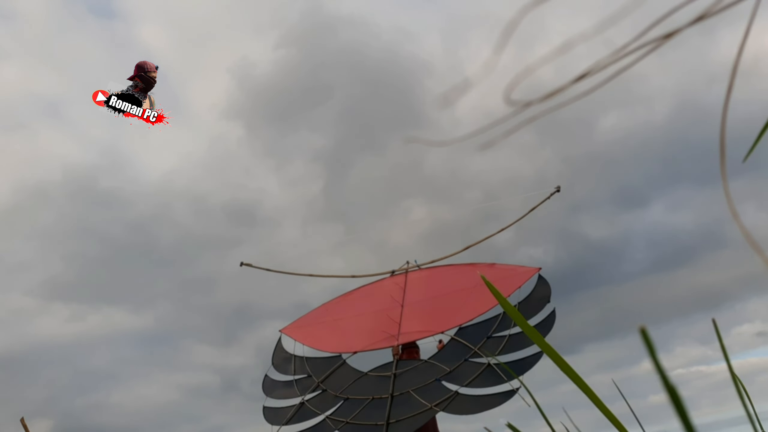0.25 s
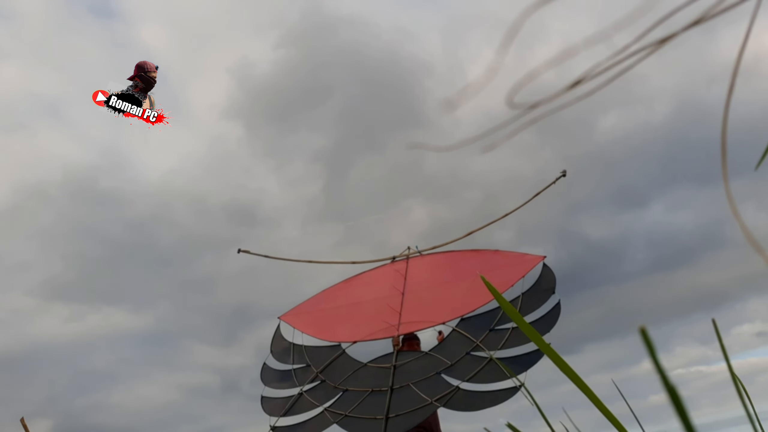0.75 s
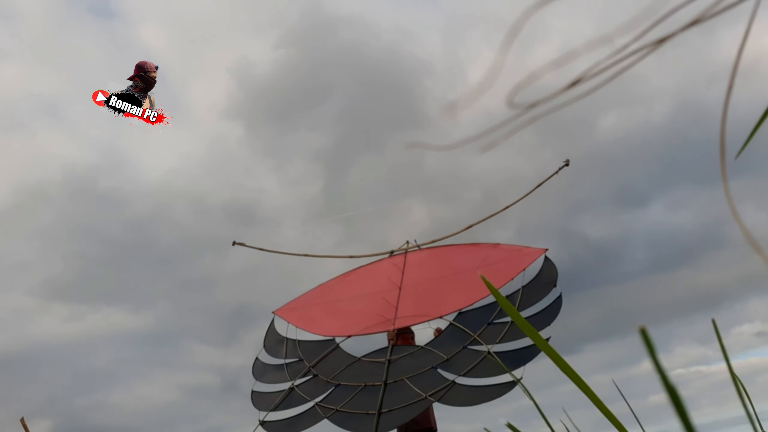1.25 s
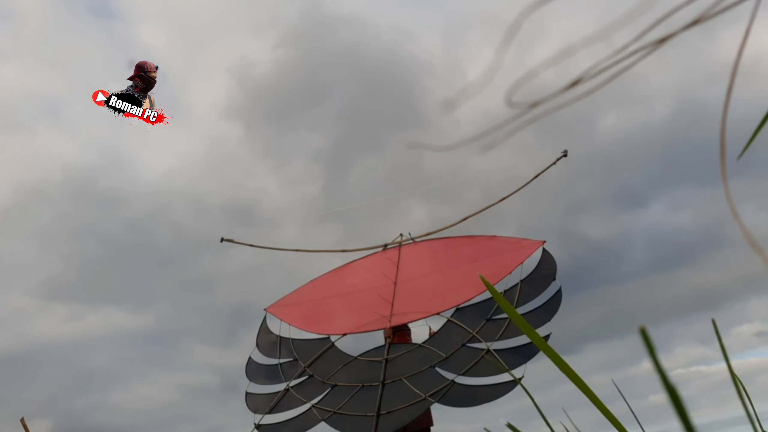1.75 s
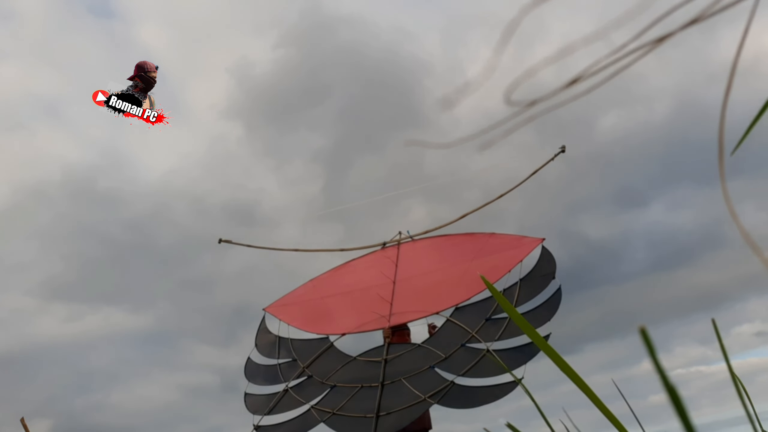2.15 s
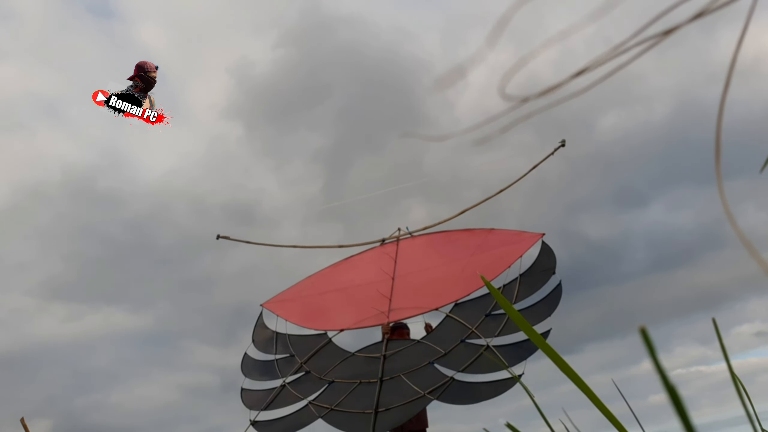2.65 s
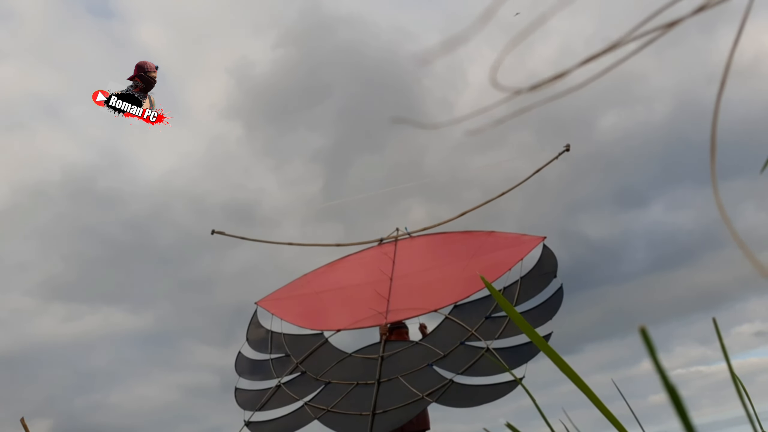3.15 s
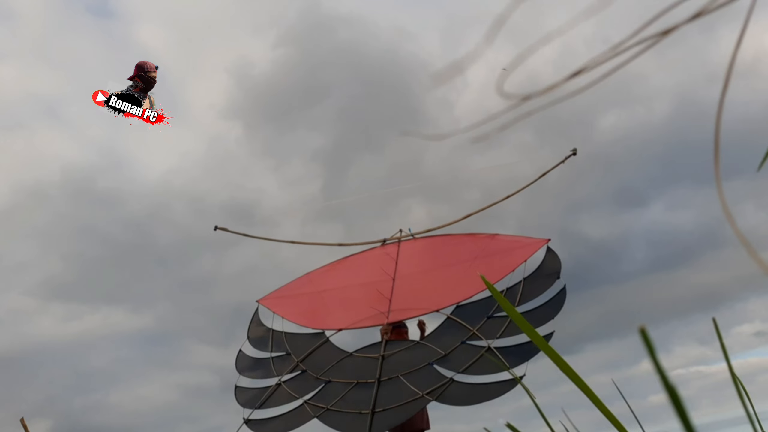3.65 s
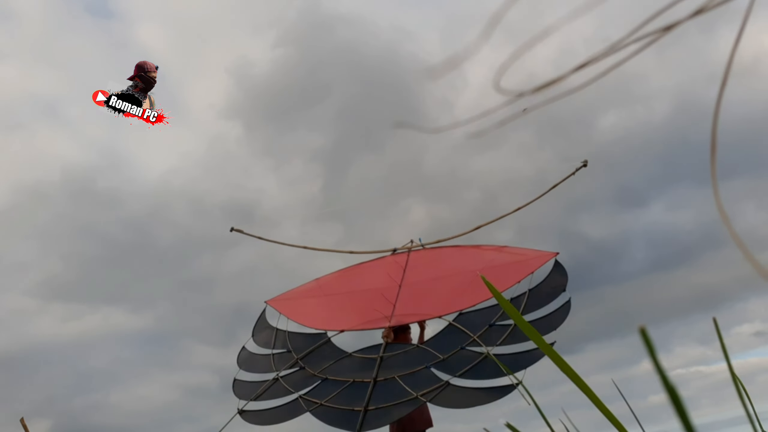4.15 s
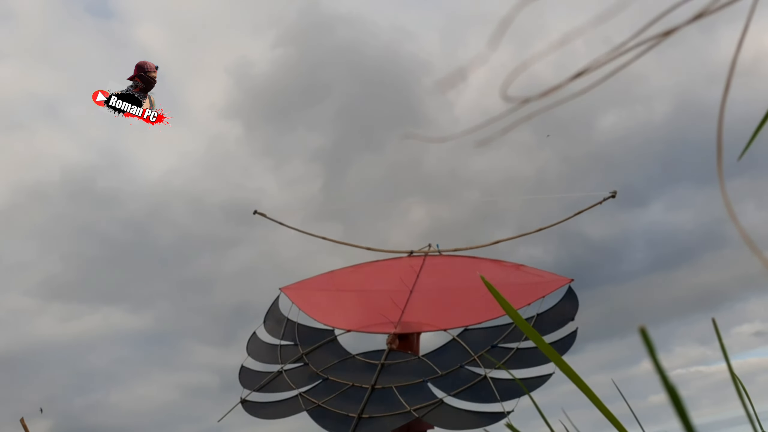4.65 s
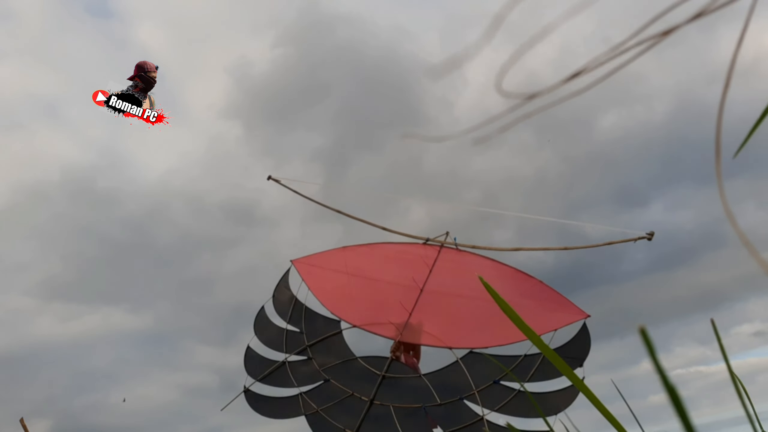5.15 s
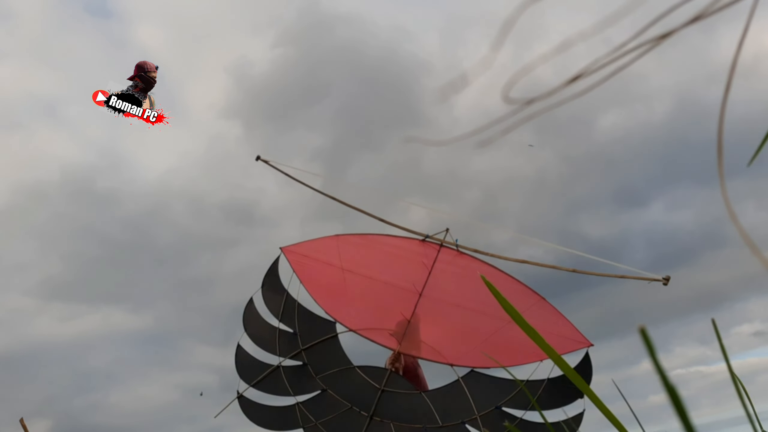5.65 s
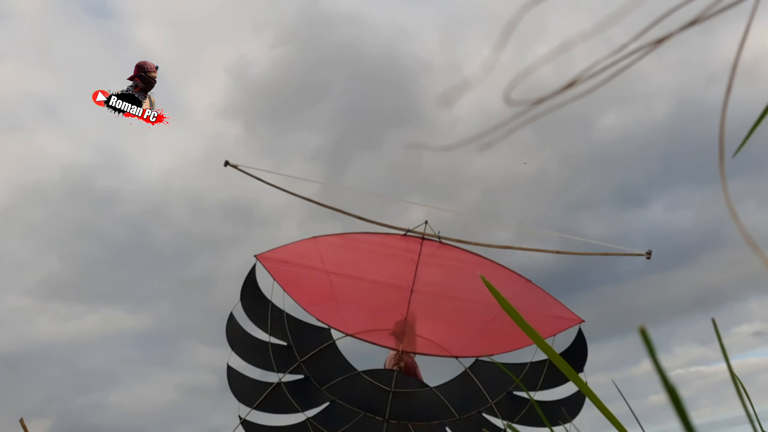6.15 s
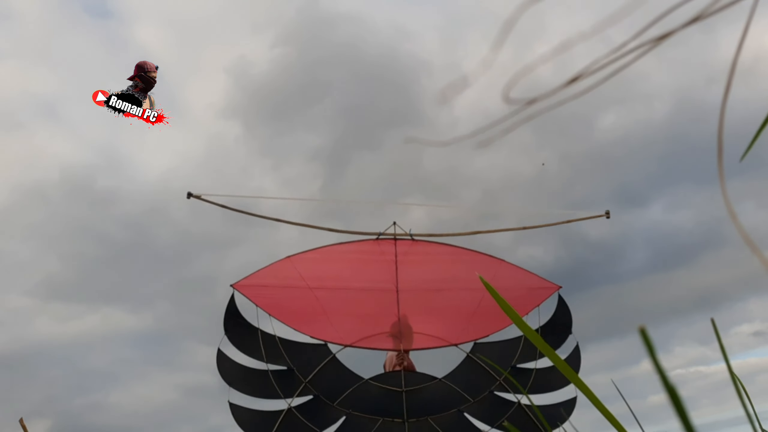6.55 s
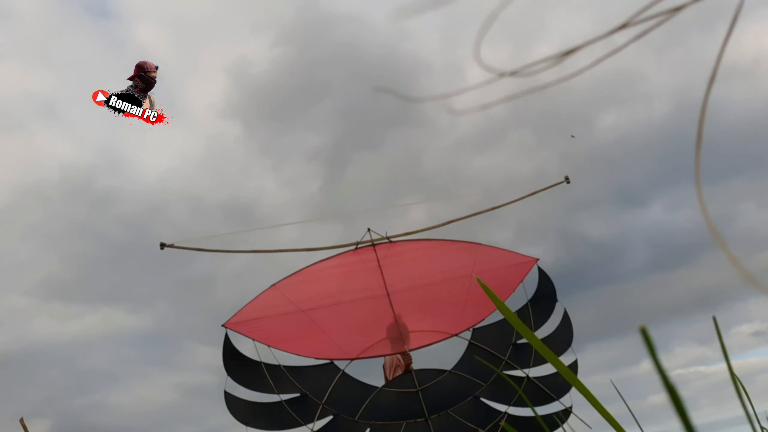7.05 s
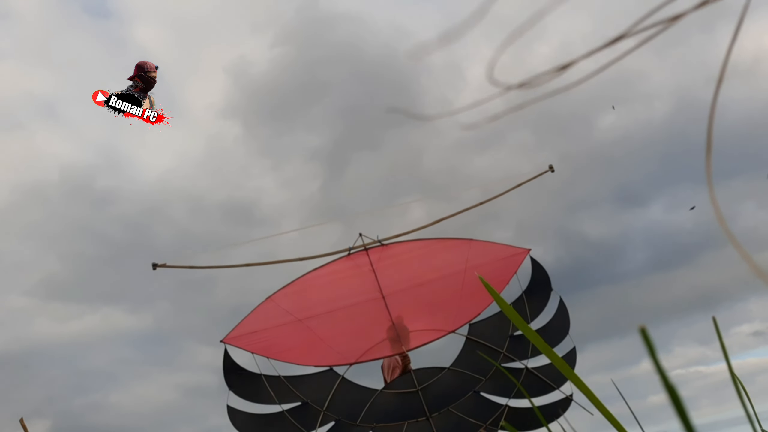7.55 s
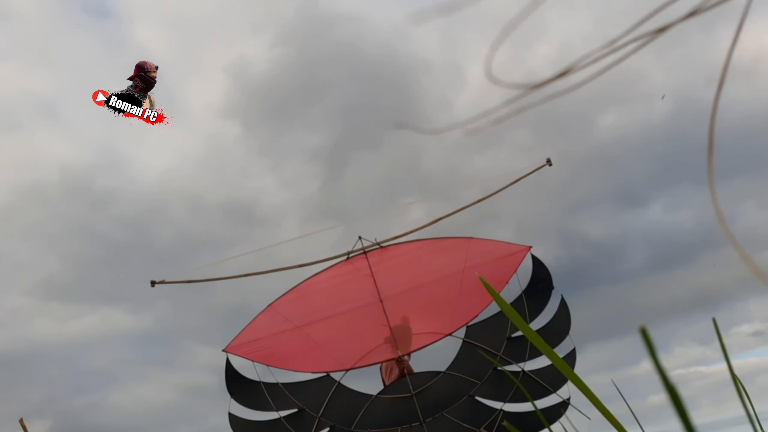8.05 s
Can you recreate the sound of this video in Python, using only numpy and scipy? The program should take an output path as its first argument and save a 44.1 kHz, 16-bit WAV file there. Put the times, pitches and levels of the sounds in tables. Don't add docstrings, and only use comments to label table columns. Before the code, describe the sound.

A deep fluttering drone dominates, quickening slightly after about three seconds, then dropping in strength near the close. Behind it a hollow midrange buzz swells in gusts, with a faint singing line and soft wind rumble. High bird cheeps and pips are scattered throughout, with a brief trill and quick warble after six seconds. Dry grass ticks sound close to the low-set stereo microphones in an open field, with hardly any echo.

```python
import sys
import numpy as np
from scipy import signal
from scipy.io import wavfile

SR = 44100
rng = np.random.default_rng(int(sys.argv[2]) if len(sys.argv) > 2 else 0)


def invert_db(x):
    u = np.asarray(x, float) / 20
    return 10 ** u


def unload_audio(sound):
    columns = np.transpose(np.atleast_2d(sound))
    steps = np.round(np.clip(columns, -1, 1) * 32767)
    wavfile.write(sys.argv[1], SR, steps.astype(np.int16))


N = 365588

# (frequency [Hz], level [dB])
FIELD_SPECTRUM = [(15, -50), (25, -13.5), (59, -12), (116, -8), (164, -4.5), (240, -17.5), (389, -15),
                  (457, -20), (649, -35.5), (1050, -41), (1460, -60), (2560, -59), (5160, -64),
                  (7930, -58.5), (15500, -80)]
# (frequency [Hz], left-right likeness [1])
FIELD_LIKENESS = [(60, 1), (130, 0.66), (290, 1), (640, 0.074), (1410, -0.18), (3100, -0.51), (6820, 0.11),
                  (15000, -0.76)]
# (frequency [Hz], left-right difference [dB])
FIELD_BALANCE = [(200, -0.2), (500, -2), (800, -4), (1100, 0), (1600, 6), (2400, -2.5), (15000, 1.5)]
# (time [s], level [dB])
NOISE_SWELL_800 = [(0, 7.5), (1.5, 5), (2.5, -1), (3.4, 2.5), (4.3, 7.5), (5.2, 4), (5.9, 7), (6.5, 4), (7.5, 7),
                   (8.29, 6)]
FIELD_DB = -39
HISS_FOLLOWS = 0.25

# (time [s], peak level [dB], swell [s], fade [s])
BRUSHES = [
    (.18, -69.5, 0.52, 0.18),
    (.6, -70, 0.35, .2),
    (0.984, -65, .06, 0.14),
    (5.89, -70, 0.23, .12),
    (6.56, -85, 0.15, 0.37),
    (8.2, -69, 0.034, 0.063),
]
# (time [s], peak level [dB], left-right difference [dB])
STALK_TICKS = [(0.5922, -53, -1), (0.837, -48.5, 10), (0.948, -59, 1), (1.542, -60, 5), (1.627, -66, 0),
               (1.709, -61.5, -27), (1.945, -55, -11.5), (4.696, -54.5, -10), (5.624, -52, -7),
               (5.884, -46, 1.5), (6.498, -50, 5.5), (6.5581, -53, 20), (6.9247, -54, -7),
               (8.197, -53.5, 10)]
# (time [s], peak level [dB])
DULL_TICKS = [
    (1.624, -51),
    (2.43, -69),
    (5.885, -64),
]
RUSTLE_FLOOR_DB, RUSTLE_SWING_DB = -81, 12.5

# (frequency [Hz], width [Hz], level [dB])
CHORUSES = [(7880, 770, -75.5), (8830, 510, -79.5), (5800, 360, -112.5), (4290, 1100, -80.5)]
# (time [s], level [dB])
PASSING_BUZZ = [(7.0, -78), (7.45, -79), (7.75, -79), (7.9, -75), (8.1, -71.5), (8.29, -77)]

# (time [s], length [s], top [Hz], level [dB])
CHEEPS = [(0.256, 0.09, 4370, -75.5), (0.775, 0.093, 4560, -68.5), (1.001, 0.17, 4780, -77),
          (1.374, 0.068, 4770, -55), (1.907, .095, 4320, -66.5), (2.085, .08, 4480, -74),
          (2.513, .122, 4000, -56), (2.754, 0.095, 4520, -60.5), (2.967, 0.11, 4200, -69.5),
          (3.793, .12, 4550, -70), (4.234, .11, 4100, -65), (4.589, .13, 4570, -72), (5.0, .118, 4050, -65),
          (6.249, 0.094, 4720, -64.5), (6.373, 0.092, 4200, -71.5), (6.451, .08, 4200, -80),
          (6.627, 0.12, 4080, -69), (6.986, 0.095, 4670, -61.5)]
# (time [s], length [s], top [Hz], level [dB])
STEPPED_CHEEPS = [(0.342, 0.083, 4800, -58.5), (1.704, 0.12, 4140, -67), (5.495, 0.105, 4680, -66.5),
                  (7.662, 0.11, 4670, -62), (7.33, 0.13, 4020, -73), (8.147, 0.13, 3980, -74)]
# (time [s], length [s], top [Hz], level [dB])
SLIDES = [(0.05, 0.096, 4000, -76), (0.406, 0.077, 4740, -72), (0.712, 0.078, 4120, -81),
          (0.995, 0.21, 4170, -77.5), (1.774, 0.14, 4795, -69), (1.962, 0.031, 3820, -81),
          (2.12, 0.095, 4500, -72), (2.439, 0.099, 4750, -73), (2.71, 0.083, 4900, -69.5),
          (2.992, 0.1, 4380, -69.5), (3.627, 0.099, 4000, -68.5), (3.174, 0.073, 4300, -81),
          (3.22, 0.12, 4430, -76.5), (3.819, 0.11, 4730, -69), (4.018, 0.13, 4190, -77),
          (4.493, 0.043, 4780, -69.5), (4.754, .1, 4560, -79.5), (4.843, 0.14, 4700, -77.5),
          (5.16, 0.11, 4800, -63), (5.754, 0.084, 5020, -70.5), (5.844, 0.075, 4010, -67.5),
          (5.953, 0.065, 3900, -74), (6.029, 0.19, 4510, -71), (6.05, 0.094, 3650, -75),
          (6.77, 0.071, 3600, -81), (6.782, 0.11, 4780, -94), (7.951, 0.12, 4720, -78)]
# (time [s], top [Hz], level [dB])
PIPS = [(.135, 4800, -73), (.496, 4950, -67), (0.827, 4920, -64), (.985, 5780, -88), (1.085, 4660, -80),
        (1.136, 5040, -70.5), (1.27, 4740, -76), (1.457, 4800, -66), (2.09, 4830, -74.5),
        (2.263, 4257, -72.5), (2.408, 4810, -69), (3.05, 4930, -72), (3.386, 4874, -68.5),
        (3.75, 4910, -73), (4.194, 4890, -74.5), (6.898, 4620, -72), (7.061, 4770, -75), (7.603, 4040, -73)]
# (time [s], level [dB])
HIGH_PIPS = [(1.815, -80), (2.125, -77), (5.145, -72), (5.44, -75), (5.734, -75), (6.025, -78), (6.33, -77),
             (6.575, -73)]
# (time [s], count [1], level [dB])
CHIP_RUNS = [(2.06, 3, -83), (3.3, 1, -85), (3.422, 3, -77), (4.46, 3, -81), (4.634, 2, -76),
             (4.84, 2, -81), (5.06, 1, -82), (5.86, 2, -80), (5.977, 4, -76), (6.3, 1, -84), (6.42, 1, -82),
             (6.62, 2, -84), (7.41, 2, -83), (7.53, 3, -78), (7.805, 2, -80), (7.99, 2, -83)]
# (time [s], level [dB])
PIPES = [(5.244, -79.5), (5.54, -78), (5.822, -80)]
# (time [s], level [dB])
WARBLE_DROPS = [
    (6.463, -64),
    (6.606, -67.5),
    (6.681, -65),
    (6.827, -67.5),
    (6.893, -65.5),
    (7.051, -72.5),
    (7.155, -73),
]
# (time [s], length [s], start [Hz], fall [Hz], level [dB])
STRAYS = [(5.932, .015, 3730, 250, -76), (6.116, .06, 4420, 79, -79), (6.203, 0.058, 4550, 100, -79),
          (6.875, .012, 2320, -450, -70), (6.14, .012, 2620, -350, -74), (6.183, 0.013, 3300, 600, -74),
          (6.563, 0.019, 2690, -450, -79), (6.645, 0.0043, 2400, -900, -68), (6.785, .01, 3050, -3, -79),
          (6.968, 0.017, 2300, 100, -77), (7.003, 0.0092, 3120, -2, -79)]
HOOK_S, CHEEP_HOOK_HZ, CHEEP_SAG_HZ_PER_S, CHEEP_BEND = .006, 500, 5000, 1.75
STEP_S, STEP_HZ, END_DROP = .037, 170, .35
SLIDE_SAG_HZ_PER_S, SLIDE_BEND = 4000, 1.5
PIP_S, PIP_SAG_HZ_PER_S = .013, 4000
HIGH_PIP_HZ, OCTAVE_DB = 6280, -1
CHIP_S, CHIP_GAP_S, CHIP_HZ, CHIP_SAG_HZ_PER_S = .017, .058, 5960, 26000
PIPE_S, PIPE_HZ = .055, 2270
TRILL_S, TRILL_LENGTH_S, TRILL_HZ, TRILL_RISE_HZ, TRILL_DB, TRILL_PER_S = 5.956, .165, 3270, 260, -61, 57
DROP_S, DROP_HZ, DROP_FALL_HZ, ANSWER_S = 0.003, 3250, 1350, .046
DOT_S, DOT_HZ, DOT_DB = .008, 2540, -2
FLICK_S, FLICK_HZ, FLICK_RISE_HZ, FLICK_DB = .008, 2800, 800, -3
FAR_CALLS, FAR_CALL_DB = 70, -92

# (time [s], level [dB])
HUM_LEVEL = [(0, -47), (1, -68.5), (2.5, -59), (4.6, -65.5), (5.3, -50), (8.29, -59.5)]
WHINE_HZ = 447

# (time [s], rate [beats per s])
RATTLE_RATE = [(0, 47), (8.29, 47)]
# (time [s], level [dB])
GUSTS = [(0.0, -42.5), (0.55, -44.5), (1.36, -51.5), (1.68, -59), (2.33, -52), (3.0, -43), (3.33, -49),
         (3.4, -55), (3.6, -59.5), (4.69, -53.5), (5.24, -57), (6.46, -44.5), (6.67, -49), (7.39, -55.5),
         (7.55, -54.5), (8.29, -51)]
# (level [dB], pitch ratio [1], damping [1], lateness [s])
BEATS = [(0, 1.035, 1.1, .0012), (-1.5, 0.995, 1.45, 0), (-.5, 1.015, 1.5, 0), (.5, 0.952, 1.1, 0)]
# (frequency [Hz], width [Hz], level [dB])
LOW_RING = [(477, 191, 2), (509, 170, 1)]
# (frequency [Hz], width [Hz], level [dB])
HIGH_RING = [(1085, 230, -0.5)]
# (frequency [Hz], width [Hz], level [dB])
TOP_RING = [(1407, 830, 0)]
# (time [s], level [dB])
LULL = [(0, -59), (1.0, -52), (1.5, -50.5), (2.2, -53), (3.0, -49.5), (3.32, -53.5), (3.4, -46), (3.9, -50),
        (4.3, -48), (4.9, -53.5), (5.6, -48.5), (6.3, -55.5), (7.0, -52.5), (7.7, -48.5), (8.29, -50)]
# (frequency [Hz], width [Hz], level [dB])
SLACK_LOW_RING = [(455.5, 110, 0)]
# (frequency [Hz], width [Hz], level [dB])
SLACK_HIGH_RING = [(783, 140, 0)]
SLACK_PITCHES = (.88, .96, 1.05, 1.16)
HIGH_RING_DB, HIGH_RING_FOLLOWS, TOP_RING_DB = -67.5, 1, -80.5
RISE_SHARE, RISE_S = .038, .00277
SLACK_LOW_DB, SLACK_HIGH_DB, SLACK_SCATTER_DB = -1, -13, 3
SLACK_LOW_FOLLOWS = 0.2
SCATTER_DB, SCATTER_S = -5, 0.083
FAR_CUT_HZ = 392

# (time [s], rate [cycles per s])
FLAP_RATE = [(0.0, 18.9), (0.25, 19.989), (1.5, 19.736), (2.0, 20.378), (2.5, 19.674), (2.6, 19.9),
             (2.7, 21.9), (2.75, 21.8), (3.25, 23.175), (4.25, 22.167), (4.5, 22.497), (6.0, 22.694),
             (6.25, 21.854), (6.75, 22.301), (7.5, 22.136), (7.6, 19.499), (7.8, 19.169), (8.29, 20.896)]
# (time [s], level [dB])
RIBBON_LEVEL = [(0.0, -29), (1.13, -30.5), (2.15, -30), (4.3, -31), (6.37, -32.5), (6.65, -34.5),
                (7.55, -35), (7.6, -40), (8.03, -45), (8.1, -40), (8.29, -40.5)]
# (delay [s], level [dB])
GROUND_ECHOES = [(0.0065, -23.5), (0.0176, -18.5), (0.0215, -20.5), (0.029, -18.5)]
# (time [s], level [dB])
FRAME_LEVEL = [(0, -15.5), (1, -5.5), (2.4, -13.5), (2.8, -15.5), (4.5, -18.5), (6.5, -16.5), (8.29, -11.5)]
FRAME_HZ, FRAME_WIDTH_HZ = 198, 25
SNAP_HZ, SNAP_SWELL_S, SNAP_LEAN_S = 166.2, .0026, 0.00064
SECOND_SNAP_S, SECOND_SNAP_DB, SLACK_SECOND_DB = 0.006962, 1, -0.5
OVERTONE_SWELL_S, OVERTONE_LEAN_S = .0026, -0.00016
OVERTONE_HZ, SLOW_OVERTONE_HZ, SLACK_OVERTONE_HZ = 324, 244, 256
OVERTONE_DB, SLOW_OVERTONE_DB, SLACK_OVERTONE_DB = -17.5, -13, -13.5
SLOW_PER_S, FAST_PER_S = 20.3, 22
SLOW_STRETCH, SLACK_STRETCH = 1.07, 1.25
SLACK_S, SLACK_JITTER_DB = 7.58, 3


def rms_one(x):
    return x / np.sqrt(np.mean(x ** 2) + 1e-20)


def in_time(rows):
    s, *columns = np.transpose(rows)
    return [np.interp(np.arange(N) / SR, s, c) for c in columns]


def on_log(points, hz):
    x, y = np.transpose(points)
    return np.interp(np.log(hz), np.log(x), y)


def drift(rate):
    r = np.exp(-80 * np.pi * rate / SR)
    white = rng.standard_normal(N // 40 + 2002)
    slow = signal.lfilter([1], [1, -2 * r, r * r], white)[2000:]
    return np.interp(np.arange(N) / 40, np.arange(len(slow)), rms_one(slow))


def resonance(x, hz, width_hz):
    r = np.exp(-np.pi * width_hz / SR)
    poles = [1, -2 * r * np.cos(2 * np.pi * hz / SR), r * r]
    return signal.lfilter([(1 - r * r) / 2, 0, (r * r - 1) / 2], poles, x)


def rounded_ring(beat, modes, ratio, damping):
    out = 0
    for hz, width_hz, db in modes:
        ring = beat
        for way in (1, -1):
            ring = ring[::way]
            for _ in range(2):
                ring = resonance(ring, hz * ratio, width_hz * damping)
        out = out + invert_db(db) * ring[::-1] / damping
    return out


def clicks(seconds, sizes):
    at = np.round(seconds * SR).astype(int)
    inside = (at >= 0) & (at < N)
    return np.bincount(at[inside], sizes[inside], N) + 1e-18


def turns(rate, start):
    cycles = start + np.cumsum(in_time(rate)[0]) / SR
    count = np.arange(1, int(cycles[-1]) + 1)
    return count, np.interp(count, cycles, np.arange(N) / SR)


def placed(x, left_db, lag_s):
    n = np.arange(N)
    left = np.interp(n - lag_s * SR, n, x)
    return np.array([invert_db(left_db / 2) * left, invert_db(-left_db / 2) * x])


def field():
    t = np.arange(N) / SR
    out, together = 0, drift(1.0)
    edges = 25 * 2 ** (np.arange(29) / 3)
    white = rng.standard_normal((2, 2, N))
    opening_db = 6 * np.exp(-t)
    swell_db, = in_time(NOISE_SWELL_800)
    hiss_db = opening_db + HISS_FOLLOWS * (in_time(GUSTS)[0] + 50)
    sides = np.array([[.5], [-.5]])
    for k, (low, high) in enumerate(zip(edges, edges[1:])):
        band = signal.butter(2, [low, high], "band", fs=SR, output="sos")
        mid, side = signal.sosfilt(band, white[k % 2])
        center = np.sqrt(low * high)
        alike = np.clip(on_log(FIELD_LIKENESS, center), 0, .99)
        db = on_log(FIELD_SPECTRUM, center) + 0.97 * together + 2.27 * drift(2.3)
        db = db + hiss_db * (1200 < low < 2800) + swell_db * (600 < low < 850)
        db = db - 0.36 * t * (low < 400)
        gain = invert_db(db + on_log(FIELD_BALANCE, center) * sides)
        out = out + gain * (np.sqrt(1 + alike) * mid + np.sqrt(1 - alike) * side * [[1], [-1]])
    out[0] = np.roll(out[0], 8)
    return invert_db(FIELD_DB) * rms_one(out)


def brushes():
    t = np.arange(N) / SR
    s, db, swell, fade = np.transpose(BRUSHES)[:, :, None]
    each = db - RUSTLE_SWING_DB * np.maximum((s - t) / swell, (t - s) / fade)
    return np.maximum(each.max(axis=0), RUSTLE_FLOOR_DB)


def grass():
    sizes = invert_db(2.86 * rng.exponential(1, (2, N))) * rng.choice([-1, 1], (2, N))
    grains = sizes * (rng.random((2, N)) < 6000 / SR)
    bright = signal.butter(2, [5000, 15500], "band", fs=SR, output="sos")
    hiss = rms_one(signal.sosfilt(bright, grains))
    s, db, left_db = np.transpose(STALK_TICKS)
    ticks = np.array([clicks(s, invert_db(db + 11.0 + sign * left_db / 2)) for sign in (1, -1)])
    dull_s, dull_db = np.transpose(DULL_TICKS)
    dull = clicks(dull_s, invert_db(dull_db + 18))
    dull = resonance(resonance(dull, 4900, 2500), 4900, 2500)
    return invert_db(brushes() + 4.5) * hiss + resonance(ticks, 9000, 9000) + dull


def insects():
    t = np.arange(N) / SR
    white = rng.standard_normal((2, N))
    out = 0
    for hz, width_hz, db in CHORUSES:
        chorus = resonance(resonance(white, hz, width_hz), hz, width_hz)
        out = out + invert_db(db + 1.1 * drift(3)) * rms_one(chorus)
    throb = np.sin(np.pi * 72 * t) ** 2
    buzz = rms_one(throb * resonance(resonance(white, 2030, 293), 1860, 300))
    arrived = np.clip(t * 4 - 28.4, 0, 1)
    return out + arrived * invert_db(in_time(PASSING_BUZZ)[0]) * buzz


def songs():
    notes = []
    for calls, step in ((CHEEPS, ()), (STEPPED_CHEEPS, (STEP_HZ,))):
        for s, n, hz, db in calls:
            notes += [(s, n, hz, CHEEP_HOOK_HZ, HOOK_S, CHEEP_SAG_HZ_PER_S * n, CHEEP_BEND, db, 0, *step)]
    notes += [(s, n, hz, 0, 1, fall_hz, 1, db, 0) for s, n, hz, fall_hz, db in STRAYS]
    notes += [(s, n, hz, 0, 1, SLIDE_SAG_HZ_PER_S * n, SLIDE_BEND, db, 0) for s, n, hz, db in SLIDES]
    notes += [(s, PIP_S, hz, 0, 1, PIP_SAG_HZ_PER_S * PIP_S, 1, db, 0) for s, hz, db in PIPS]
    for s, count, db in CHIP_RUNS:
        for k in range(count):
            at = s + CHIP_GAP_S * k
            notes += [(at, CHIP_S, CHIP_HZ, 0, 1, CHIP_SAG_HZ_PER_S * CHIP_S, 1, db + 4.5, 0)]
    for s, db in HIGH_PIPS:
        notes += [(s, PIP_S, n * HIGH_PIP_HZ, 0, 1, 0, 1, db + OCTAVE_DB * (n - 1), 0) for n in (1, 2)]
    for a, b, c, d in rng.random((FAR_CALLS, 4)):
        top_hz, db = 3700 + 1300 * c, FAR_CALL_DB + 5 * d
        notes += [(8.2 * a, .04 + .1 * b, top_hz, CHEEP_HOOK_HZ, HOOK_S, 350 * b, CHEEP_BEND, db, 0)]
    notes += [(s, PIPE_S, PIPE_HZ, 0, 1, 60, 1, db, 0) for s, db in PIPES]
    notes += [(TRILL_S, TRILL_LENGTH_S, TRILL_HZ, TRILL_RISE_HZ, .07, 0, 1, TRILL_DB, TRILL_PER_S)]
    notes += [(s, DROP_S, DROP_HZ, 0, 1, DROP_FALL_HZ, 1, db, 0) for s, db in WARBLE_DROPS]
    for s, db in WARBLE_DROPS[::2]:
        notes += [(s + ANSWER_S, DOT_S, DOT_HZ, 300, .002, 0, 1, db + DOT_DB, 0)]
    for s, db in WARBLE_DROPS[1::2]:
        notes += [(s + ANSWER_S, FLICK_S, FLICK_HZ, FLICK_RISE_HZ, .007, 0, 1, db + FLICK_DB, 0)]
    return notes


def birds():
    out = np.zeros((2, N + SR))
    waver = 1 + .006 * drift(70) + .005 * drift(25)
    flutter_db = 2.4 * drift(45)
    pans = rng.normal(-1, 3, 220)
    for k, (s, length, top_hz, hook_hz, hook_s, fall_hz, bend, db, trill, *step_hz) in enumerate(songs()):
        u = np.linspace(0, 1, int((length + 0.011) * SR))
        t = np.arange(len(u)) / SR
        hz = top_hz - hook_hz * np.exp(-t / hook_s) - fall_hz * u ** bend
        hz -= END_DROP * hook_hz * u ** 12
        hz += sum(step_hz) * ((t - .005) / STEP_S % 1) ** 3
        own = slice(k * 1597, k * 1597 + len(u))
        tone = np.sin(2 * np.pi * np.cumsum(hz * waver[own]) / SR)
        tone *= np.sin(np.pi * u ** 0.8) ** (.25 if trill else .5)
        tone *= invert_db(db + 4.5 + flutter_db[own] * (trill == 0)) * np.cos(np.pi * trill * t) ** 2
        at = int(s * SR)
        out[0, at:at + len(u)] += invert_db(pans[k] / 2) * tone
        out[1, at + 2:at + 2 + len(u)] += invert_db(-pans[k] / 2) * tone
    out = out[:, :N]
    fade = invert_db(-60 * np.arange(SR // 4) / SR / .35)
    tail = rng.standard_normal((2, SR // 4)) * fade
    out = out + invert_db(-41) * signal.fftconvolve(out, tail, axes=1)[:, :N]
    return out + invert_db(-17) * np.roll(out[::-1], 700, axis=1) + invert_db(-26) * np.roll(out, 1900, axis=1)


def steady_hum():
    phase = 2 * np.pi * np.cumsum(WHINE_HZ * (1 + .003 * drift(2))) / SR
    return placed(invert_db(in_time(HUM_LEVEL)[0] + 2.5 * drift(4)) * np.sin(phase), 0, -.0003)


def slack_beats(s):
    strength, pitch, late = rng.random((420, 3))[:len(s)].T
    low, high = 0, 0
    for k, ratio in enumerate(SLACK_PITCHES):
        mine = (4 * pitch).astype(int) == k
        beat = clicks(s - .003 + .0016 * late, invert_db(SLACK_SCATTER_DB * (4 * strength - 2)) * mine)
        low = low + rounded_ring(beat, SLACK_LOW_RING, ratio, 1.24)
        high = high + rounded_ring(beat, SLACK_HIGH_RING, ratio, 1.71)
    low = placed(invert_db(SLACK_LOW_DB) * rms_one(low), 4, -0.00041)
    high = placed(invert_db(SLACK_HIGH_DB) * rms_one(high), -12, 0)
    db, = in_time(LULL)
    low_db = db.mean() + SLACK_LOW_FOLLOWS * (db - db.mean())
    return invert_db(db) * high + invert_db(low_db) * low


def far_hummer():
    low_db, = in_time(GUSTS)
    high_db = HIGH_RING_DB + HIGH_RING_FOLLOWS * (low_db - low_db.mean())
    count, s = turns(RATTLE_RATE, .76)
    place = (count + 3 * (s > 4.7)) % 4
    timing, strength = rng.standard_normal((420, 2))[:len(s)].T
    low, high, top = 0, 0, 0
    for k, (db, ratio, damping, late) in enumerate(BEATS):
        mine = place == k
        beat = clicks(s - .0022 + late + .00025 * timing, invert_db(db + 2.1 * strength) * mine)
        steady = clicks(s - .0022 + .0001 * timing, invert_db(.6 * db + 1.8 * strength) * mine)
        low = low + rounded_ring(steady, LOW_RING, ratio, damping)
        top = top + rounded_ring(beat, TOP_RING, ratio, 0.65)
        for way in (-1, 1):
            ring = rounded_ring(beat, HIGH_RING, ratio ** 2 * (1 + way * RISE_SHARE), damping)
            high = high + np.roll(ring, int(way * RISE_S / ratio ** 2 / 2 * SR))
    low = placed(invert_db(low_db) * rms_one(low), 6, -.0004)
    low[1] += invert_db(-19.5) * np.roll(low[1], 330)
    high = placed(invert_db(high_db + 4) * rms_one(high), -10, 0)
    top = placed(invert_db(high_db - HIGH_RING_DB + TOP_RING_DB) * rms_one(top), 1.3, 0)
    soft = signal.butter(4, 1400, fs=SR, output="sos")
    return signal.sosfilt(soft, low + high) + slack_beats(s) + top


def scattered(x):
    tail = rng.standard_normal(8000) * invert_db(-60 * np.arange(8000) / SR / SCATTER_S)
    diffuse = signal.fftconvolve(x, tail[None] / np.linalg.norm(tail), axes=1)[:, :N]
    return x + invert_db(SCATTER_DB) * diffuse


def snaps(s, weight, chance, stretch, overtone_hz, overtone_db, second_db):
    spread_db = .5 + SLACK_JITTER_DB * (s > SLACK_S)
    first = clicks(s, weight * invert_db(spread_db * chance[:, 1]))
    second_s = s + SECOND_SNAP_S * stretch ** .6 + .0001 * chance[:, 2]
    second = clicks(second_s, weight * invert_db(second_db + spread_db * chance[:, 3]))
    t = np.arange(-800, 801) / SR / stretch
    slow_t = t * stretch ** .5
    swing = np.exp(-(slow_t / SNAP_SWELL_S) ** 2 / 2) * np.sin(2 * np.pi * SNAP_HZ * (slow_t - SNAP_LEAN_S))
    overtone = np.sin(2 * np.pi * overtone_hz * (slow_t - OVERTONE_LEAN_S))
    swing += invert_db(overtone_db) * np.exp(-(t / OVERTONE_SWELL_S) ** 2 / 2) * overtone
    return signal.fftconvolve(first + second, swing, "same")


def near_ribbon():
    _, s = turns(FLAP_RATE, .315)
    chance = rng.standard_normal((200, 4))[:len(s)]
    fast = np.clip((1 / np.gradient(s) - SLOW_PER_S) / (FAST_PER_S - SLOW_PER_S), 0, 1)
    slack = s > SLACK_S
    s = s - .13 * np.gradient(s) + .0001 * chance[:, 0]
    direct = snaps(s, fast * ~slack, chance, 0.97, OVERTONE_HZ, OVERTONE_DB, SECOND_SNAP_DB)
    direct += snaps(s, (1 - fast) * ~slack, chance, SLOW_STRETCH,
                    SLOW_OVERTONE_HZ, SLOW_OVERTONE_DB, SECOND_SNAP_DB)
    direct += snaps(s, 1 * slack, chance, SLACK_STRETCH ** 2,
                    SLACK_OVERTONE_HZ, SLACK_OVERTONE_DB, SLACK_SECOND_DB)
    heard = direct + sum(invert_db(db) * np.roll(direct, int(lag * SR)) for lag, db in GROUND_ECHOES)
    heard += invert_db(in_time(FRAME_LEVEL)[0]) * 2 * resonance(direct, FRAME_HZ, FRAME_WIDTH_HZ)
    return placed(invert_db(in_time(RIBBON_LEVEL)[0]) * rms_one(heard), -1.5, .00018)


def scene():
    background = field() + grass() + insects() + birds() + steady_hum()
    no_bass = signal.butter(4, FAR_CUT_HZ, "high", fs=SR, output="sos")
    return background + scattered(signal.sosfilt(no_bass, far_hummer())) + near_ribbon()


def band_limit(x):
    return signal.sosfilt(signal.butter(12, 15690, fs=SR, output="sos"), x)


def record(dry):
    no_deep_bass = signal.butter(3, 62, "high", fs=SR, output="sos")
    heard = signal.sosfilt(no_deep_bass, dry)
    return band_limit(heard)


dry = scene()
out = record(dry)
unload_audio(out)
```